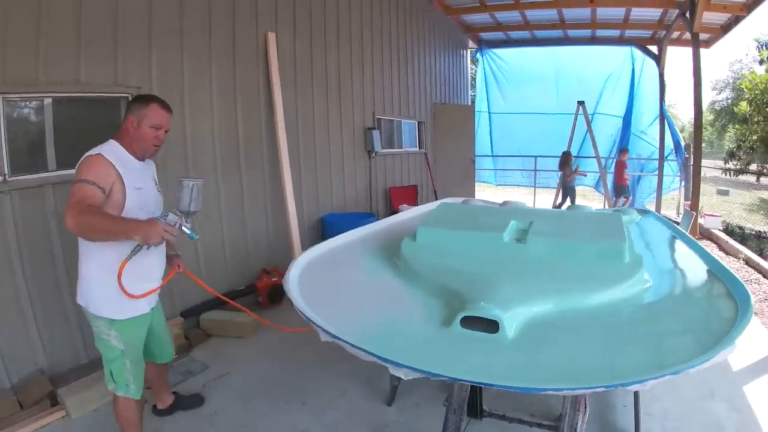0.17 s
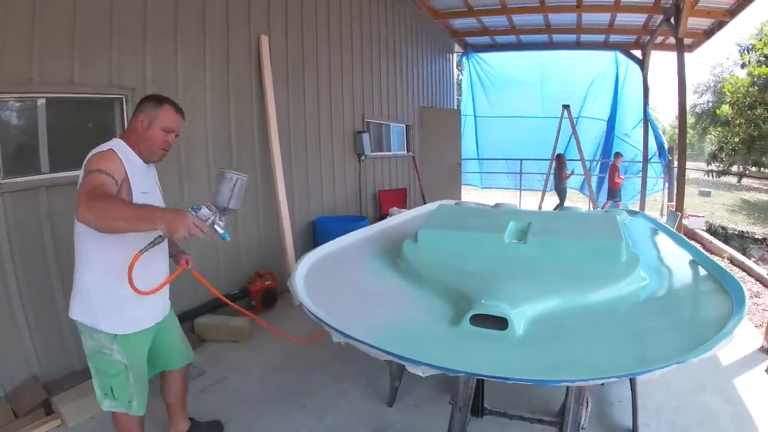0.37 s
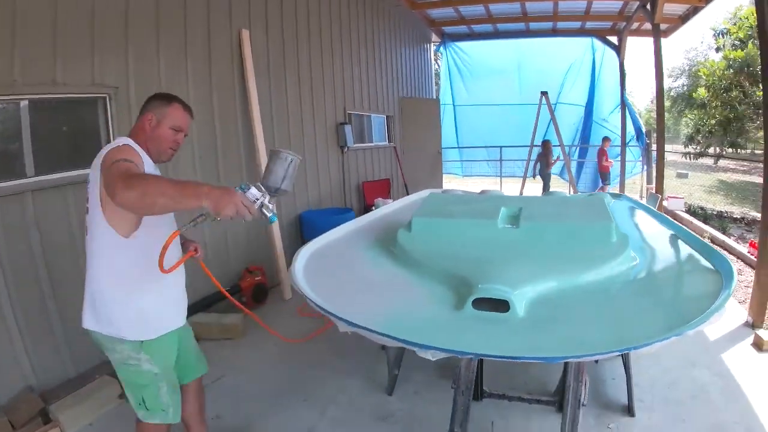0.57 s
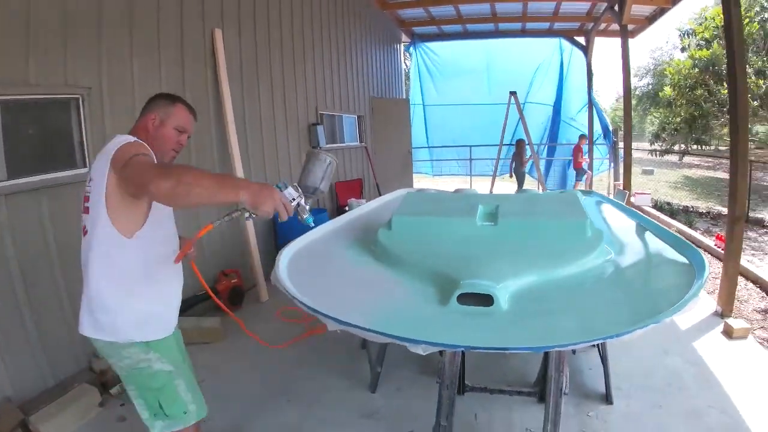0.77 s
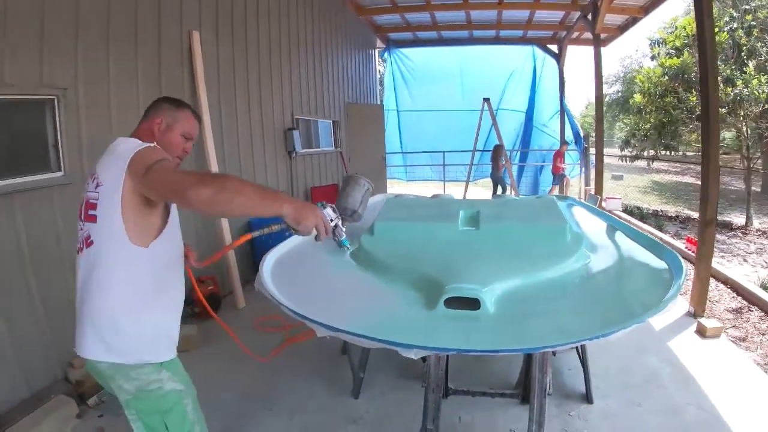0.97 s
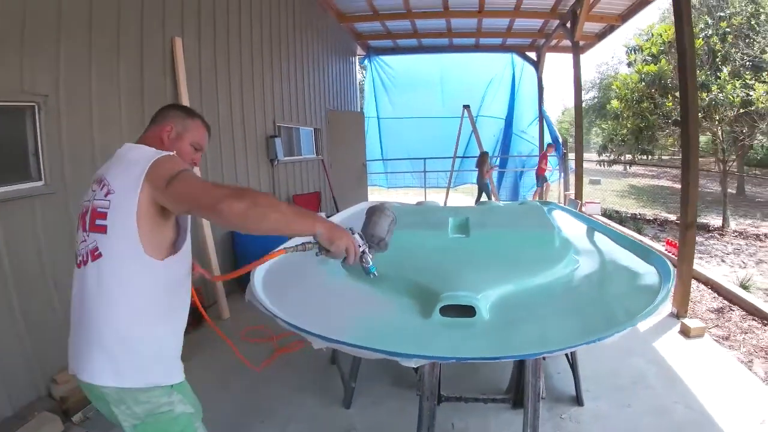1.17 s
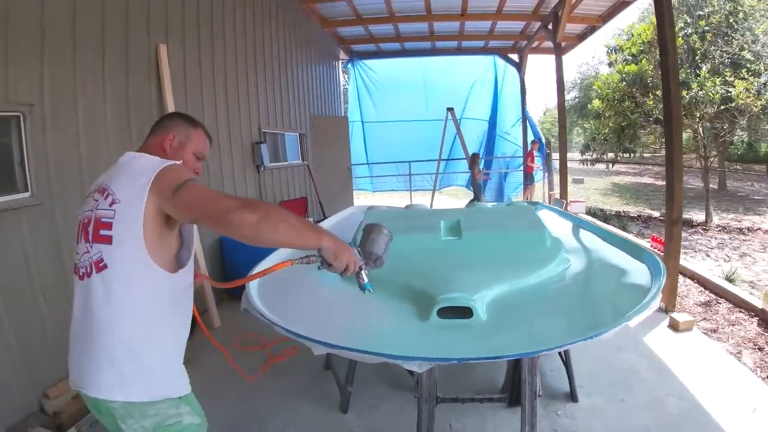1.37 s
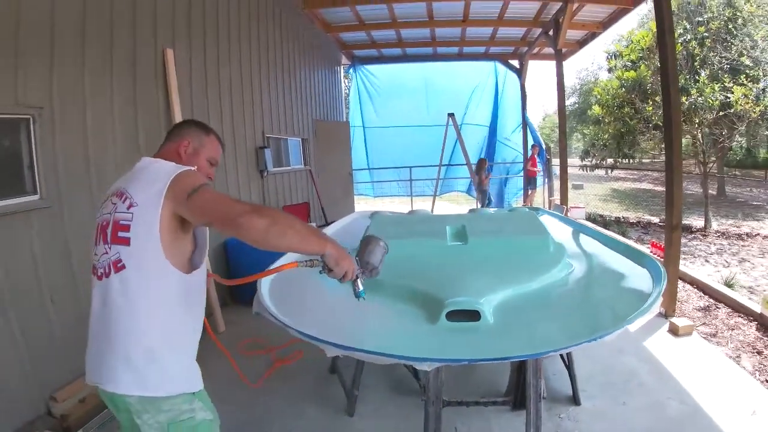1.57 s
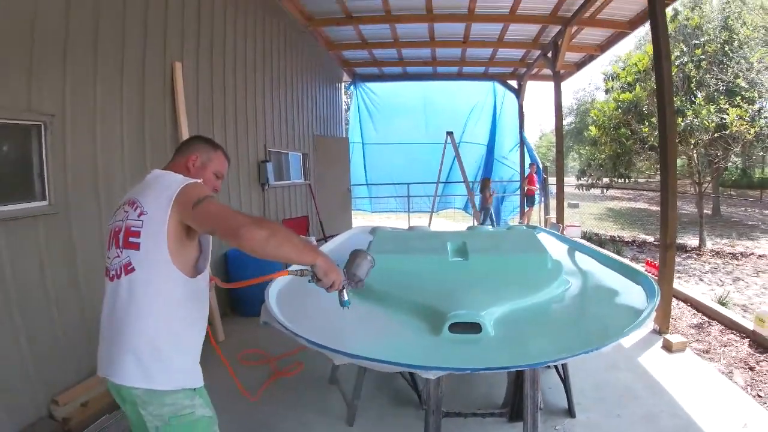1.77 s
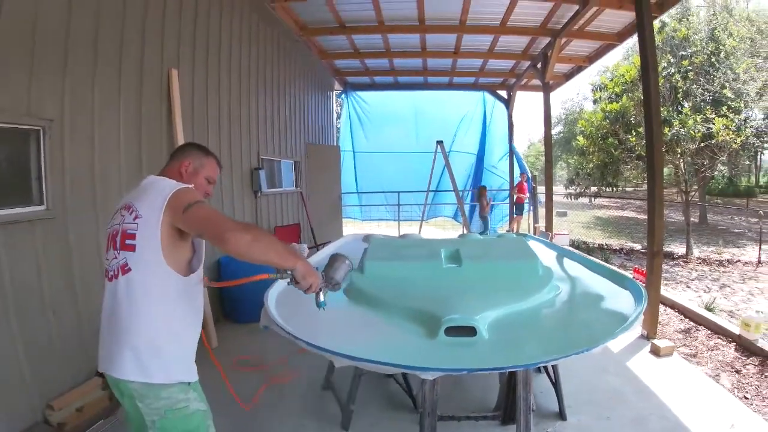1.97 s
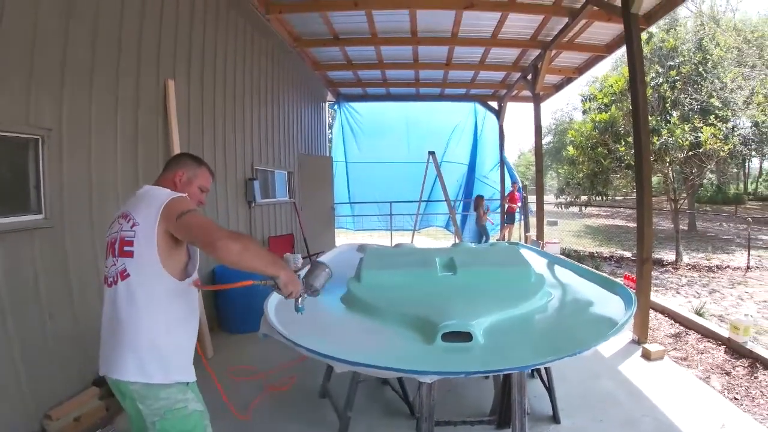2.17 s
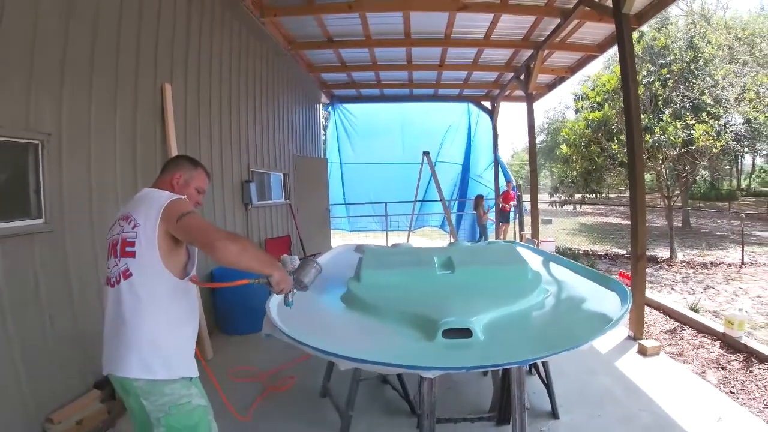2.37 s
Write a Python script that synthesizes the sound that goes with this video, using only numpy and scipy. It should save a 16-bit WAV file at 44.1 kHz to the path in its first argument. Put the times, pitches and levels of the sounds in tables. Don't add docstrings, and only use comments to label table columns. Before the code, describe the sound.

A paint spray gun bursts into a loud steady hiss after shoe scuffs and buffeting wind outdoors

```python
import sys
import numpy as np
from scipy import signal
from scipy.fft import rfft, irfft, next_fast_len
from scipy.io import wavfile
from scipy.ndimage import uniform_filter1d, map_coordinates

SR = 44100
rng = np.random.default_rng(int(sys.argv[2]) if len(sys.argv) > 2 else 0)


def nominal_scale(level):
    x = np.asarray(level, float) / 20
    return 10 ** x


def master_out(mix):
    frames = np.transpose(np.atleast_2d(mix))
    ceiling = np.clip(frames, -1, 1)
    pcm = np.round(ceiling * 32767).astype(np.int16)
    wavfile.write(sys.argv[1], SR, pcm)


N = 106281


def unit(x):
    return x / np.sqrt(np.mean(x ** 2) + 1e-20)


def along(points, hz):
    f, v = np.transpose(points)
    return nominal_scale(np.interp(np.log(hz + 1), np.log(f + 1), v))


def curves(rows):
    s, *cols = np.transpose(rows)
    return [np.interp(np.arange(N) / SR, s, c) for c in cols]


def wobble(rate_hz):
    return map_coordinates(rng.standard_normal(N), [np.arange(N) * rate_hz / SR])


def filtered(x, response):
    m = next_fast_len(len(x) + 8192)
    return irfft(rfft(x, m) * response(np.fft.rfftfreq(m, 1 / SR)), m)[:len(x)]


def rush(spectrum, patchy_db):
    z = signal.stft(rng.standard_normal(N), nperseg=512)[2]
    field = uniform_filter1d(rng.standard_normal(z.shape), size=6, axis=0)
    field = uniform_filter1d(field, size=14, axis=1)
    x = signal.istft(z * nominal_scale(patchy_db * unit(field)), nperseg=512)[1][:N]
    return unit(filtered(x, lambda hz: along(spectrum, hz)))


def add(track, s, x):
    part = track[round(s * SR):][:len(x)]
    part += x[:len(part)]


# frequency in Hz, density in dB per Hz.
AIR_COLOUR = [(90, -10), (160, 16), (400, 9), (800, 11.5), (1200, 6.5), (3500, 3.5), (8500, 1.5),
              (15700, -16)]
# time in seconds, level in dB.
LEAF_SWELL = [(0, 4), (.12, 1.5), (.3, 2.5), (.5, 2), (.62, 6.5), (.76, 1), (.87, -2.5), (1.1, -1),
              (1.16, -3)]


def open_air():
    level_db = -52 + curves(LEAF_SWELL)[0]
    return rush(AIR_COLOUR, 0.5) * nominal_scale(level_db)


# time in seconds, strength in dB, share of small fast eddies in dB.
WIND_COURSE = [(0.0, -57, 17.5), (0.09, -38, -7), (0.62, -27.5, -10.5), (0.75, -31.5, -15),
               (0.78, -34, -5.5), (0.81, -38, -2), (1.06, -23.5, -15.5), (1.09, -32, -7.5), (1.4, -42, -5),
               (1.72, -40.5, 1), (1.94, -21, -8), (2.03, -19.5, -14), (2.07, -33.5, 1.5), (2.12, -22.5, -4),
               (2.19, -25.5, -1), (2.29, -16, 0.5), (2.31, -14, -6), (2.41, -41, 11)]
# frequency in Hz, density in dB per Hz.
RUMBLE_COLOUR = [(12, -49), (22, 14), (50, 7), (90, -9.5), (160, -39.5)]
# frequency in Hz, density in dB per Hz.
EDDY_COLOUR = [(40, -18), (80, -3), (130, -2), (220, -10.5), (400, -18), (900, -22.5), (1500, -62)]


def wind():
    strength_db, eddy_db = curves(WIND_COURSE)
    rumble = rush(RUMBLE_COLOUR, 0.2)
    flutter = unit(rush(EDDY_COLOUR, 2.5) * nominal_scale(1 * wobble(30)))
    return (rumble + nominal_scale(eddy_db) * flutter) * nominal_scale(strength_db - 5.5)


# start in seconds, level in dB, frequency in Hz.
PORT_PUSHES = [(.10, -29, 37.2), (0.317, -24.5, 63.7), (0.389, -29, 59.7), (.416, -18.5, 116),
               (.43, -22.5, 40.3), (.505, -24.5, 44.2), (.582, -17.5, 114), (0.595, -20, 43.6),
               (0.61, -18, 75), (0.776, -22.5, 134), (0.866, -22, 38), (0.959, -21, 130),
               (0.995, -15.5, 83), (1.021, -18.5, 55), (1.044, -19, 48.4), (1.11, -24, 68.5),
               (1.19, -30.5, 34.5), (1.947, -30, 43), (2.005, -22, 44), (2.008, -19, 203), (2.106, -20, 40),
               (2.143, -18, 38.5), (2.194, -11.5, 112), (2.215, -15, 55.4), (2.26, -6.5, 184),
               (2.265, -8, 68), (2.28, -13, 60.3), (2.31, -11.5, 33.7)]


def wind_pushes():
    decay_cycles = 0.76
    out, t = np.zeros(N), np.arange(SR // 10) / SR
    for s, db, hz in PORT_PUSHES:
        cycles = t * hz
        envelope = np.exp(-(cycles / decay_cycles) ** 2) * np.tanh(8 * cycles)
        add(out, s, nominal_scale(db) * np.sin(2 * np.pi * cycles) * envelope)
    return out


# start in seconds, level in dB, length in seconds.
PORT_RATTLES = [(2.009, -27.5, 0.004), (2.18, -24.5, 0.014), (2.194, -26.5, 0.024), (2.221, -30.5, 0.007),
                (2.248, -29, 0.031), (2.258, -15.5, 0.01), (2.283, -23, .014), (2.309, -42, 0.23)]
# frequency in Hz, gain in dB.
PORT_COLOUR = [(150, 2), (350, 3), (900, 0.5), (1450, 5.5), (1700, -19), (2200, -80)]


def wind_rattle():
    rise_s = 0.00063
    gate, t = np.zeros(N), np.arange(SR // 10) / SR
    for s, db, length_s in PORT_RATTLES:
        add(gate, s, nominal_scale(db) * np.clip(t / rise_s, 0, 1) * np.exp(-(t / length_s) ** 2))
    return gate * rush(PORT_COLOUR, 0.8)


# start in seconds, length in seconds, from Hz, to Hz, level in dB.
BIRD_CHIRP = (1.193, .05, 5400, 6100, -61)


def bird():
    s, length_s, from_hz, to_hz, db = BIRD_CHIRP
    out, u = np.zeros(N), np.linspace(0, 1, round(length_s * SR))
    hz = from_hz + (to_hz - from_hz) * u ** 0.5
    phase = 2 * np.pi * np.cumsum(hz) / SR + wobble(300)[:len(u)]
    add(out, s, nominal_scale(db) * np.sin(np.pi * u) ** 0.5 * np.sin(phase))
    return out


def resonance(x, hz, q):
    def response(f):
        damping = 1j * f * hz / q
        return (damping / (hz * hz - f * f + damping)) ** 2
    return unit(filtered(x, response))


# start in seconds, level in dB, centre in Hz, rise in seconds, t60 in seconds.
SHOE_SCUFFS = [(.034, -39.5, 4700, 0.0054, 0.28), (0.037, -44, 7800, 0.013, .12),
               (0.324, -46.5, 3300, 0.0011, 0.12), (0.353, -39.5, 3000, 0.0047, 0.34),
               (.356, -35.5, 820, 0.0053, 0.22), (.555, -33, 3650, 0.0016, 0.044),
               (0.561, -40, 3300, 0.0034, 0.17), (0.579, -37.5, 3380, 0.0051, 0.14),
               (0.618, -47, 2840, .03, 0.57), (0.638, -45, 6500, .002, .04),
               (0.701, -41, 3800, 0.012, 0.11), (0.726, -44.5, 1400, 0.004, 0.19),
               (0.732, -50, 6900, 0.0037, 0.35), (.969, -25, 3520, 0.0099, 0.095),
               (0.976, -41, 6600, 0.012, 0.21), (1.006, -38.5, 1390, 0.0035, 0.11),
               (1.067, -39, 1200, 0.0022, 0.11)]


def shuffle():
    out, t = np.zeros(N), np.arange(SR // 2) / SR
    for s, db, hz, rise_s, t60_s in SHOE_SCUFFS:
        grit = rng.standard_normal(len(t)) * nominal_scale(3 * wobble(500)[:len(t)])
        body = unit(resonance(grit, hz, q=0.69) + 0.35 * resonance(grit, hz, q=3.5))
        add(out, s, body * nominal_scale(db - 60 * t / t60_s) * np.clip(t / rise_s, 0, 1))
    return out


# start in seconds, level in dB.
FITTING_CLINKS = [
    (.555, -52),
    (0.977, -36),
]
# frequency in Hz, level in dB, t60 in seconds.
FITTING_MODES = [(3400, -7, .45), (3150, -4, .15), (4250, 0, .12), (7700, -8, .25)]
CLINK_PITCHES = [1.08, 1]
CLINK_LIVES = [.08, 1]


def clinks():
    out, t = np.zeros(N), np.arange(SR // 2) / SR
    for (s, db), pitch, life in zip(FITTING_CLINKS, CLINK_PITCHES, CLINK_LIVES):
        shake = nominal_scale(1.9 * wobble(66)[:len(t)])
        blur_rad = 1.5 * wobble(397)[:len(t)]
        ring = np.zeros(len(t))
        for hz, mode_db, t60_s in FITTING_MODES:
            decay = nominal_scale(db + mode_db - 60 * t / (t60_s * life))
            ring += decay * np.sin(2 * np.pi * hz * pitch * t + blur_rad)
        add(out, s, shake * ring)
    return out


# frequency in Hz, gain in dB.
BOOM_COLOUR = [(110, -29), (150, -3.5), (200, 2), (270, -9.5), (400, -11), (900, -33), (1500, -50)]


def hull_boom():
    return nominal_scale(-24) * rush(BOOM_COLOUR, 1.95)


# frequency in Hz, gain in dB.
FIRST_AIR_COLOUR = [(5000, -30), (7000, -1), (9000, -4), (13000, 0), (15700, -14)]


def first_air(open_s):
    level_db, fade_s = -1, 0.15
    t = np.arange(N) / SR
    return nominal_scale(level_db) * np.exp(-np.abs(t - open_s) / fade_s) * rush(FIRST_AIR_COLOUR, 1.2)


# time in seconds, level in dB, nozzle-to-hull echo delay in milliseconds.
JET_COURSE = [
    (1.248, -102, 0.35),
    (1.256, -34.5, 0.49),
    (1.27, -19, 0.36),
    (1.516, -20.5, 0.34),
    (2.306, -22.5, 0.353),
    (2.41, -27.5, 0.38),
]
# frequency in Hz, density in dB per Hz.
HISS_COLOUR = [(250, -40), (400, -15), (1200, -12.5), (3000, -2.5), (6500, -1), (8800, -1), (11500, 0.5),
               (15700, -6.5)]


def jet():
    hull_echo, trim_db = 0.1, 0.5
    level_db, delay_ms = curves(JET_COURSE)
    open_s = JET_COURSE[0][0]
    n = np.arange(N)
    hiss = rush(HISS_COLOUR, 1.16)
    echo = map_coordinates(hiss, [n - delay_ms * SR / 1000])
    sputter = nominal_scale(0.24 * wobble(200))
    sound = unit(hiss + hull_echo * echo) * sputter + hull_boom() + first_air(open_s)
    surge_db = 0.42 * wobble(6.9)
    return sound * nominal_scale(level_db + trim_db + surge_db) * (n > open_s * SR)


def carport(x):
    t60_s, wet_db, gap_s = 0.19, -6.5, 0.006
    t = np.arange(SR // 2) / SR
    tail = rng.standard_normal(len(t)) * nominal_scale(-60 * t / t60_s) * (t > gap_s)
    return x + nominal_scale(wet_db) * signal.fftconvolve(x, tail / np.linalg.norm(tail))[:N]


def scene():
    jet_wet = 0.45
    spray = jet()
    roofed = carport(shuffle() + clinks() + bird() + jet_wet * spray)
    gusts = wind() + wind_pushes() + wind_rattle()
    return np.tile(roofed + (1 - jet_wet) * spray + gusts + open_air(), (2, 1))


def top_cut(x):
    return signal.sosfilt(signal.butter(12, 15690, fs=SR, output="sos"), x)


# frequency in Hz, gain in dB.
MIC_RESPONSE = [(5, -44), (18, 0), (8800, 1.5), (10000, -5.5), (11500, -14.5), (15000, -16)]


def record(dry):
    ceiling, knee, top_hz = 0.67, 3.1, 15720
    side_hz, side_db, lean = 11580, -2, 0.12
    soft = dry[0] / (1 + np.abs(dry[0] / ceiling) ** knee) ** (1 / knee)
    mid = filtered(soft, lambda hz: along(MIC_RESPONSE, hz) * (hz < top_hz))
    scatter = rng.standard_normal(2500) / 50
    spread = nominal_scale(side_db) * signal.fftconvolve(mid, scatter)[:N] + lean * mid
    side = filtered(spread, lambda hz: np.clip((hz - side_hz) / 800, 0, 1))
    return top_cut(np.array([mid + side, mid - side]))


dry = scene()
out = record(dry)
master_out(out)
```